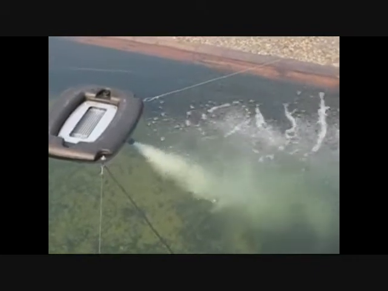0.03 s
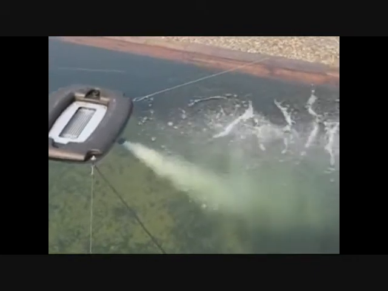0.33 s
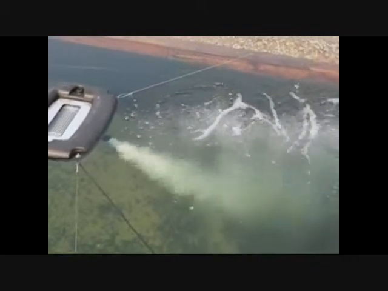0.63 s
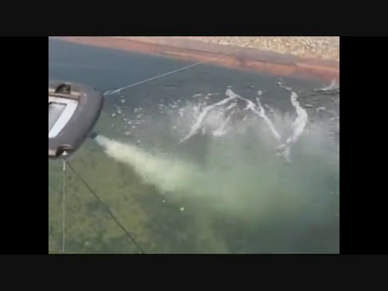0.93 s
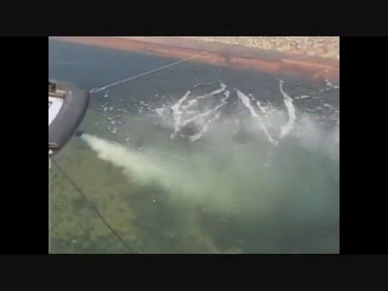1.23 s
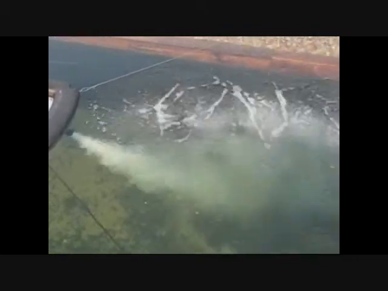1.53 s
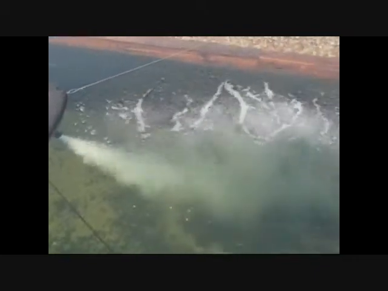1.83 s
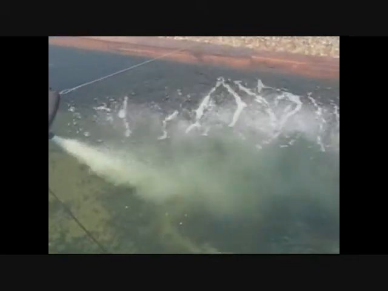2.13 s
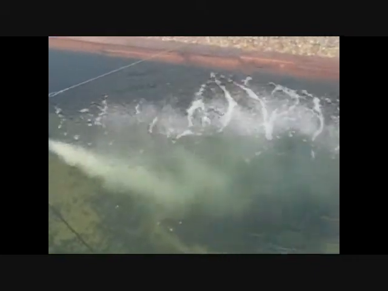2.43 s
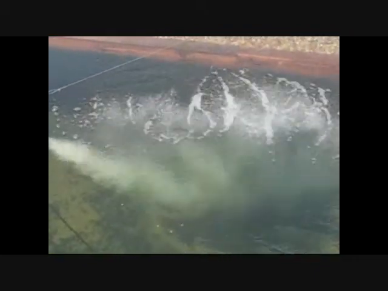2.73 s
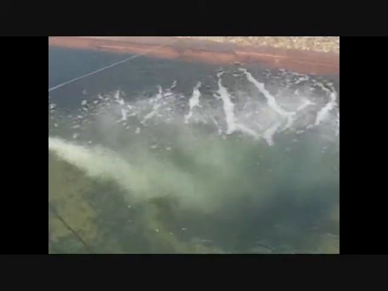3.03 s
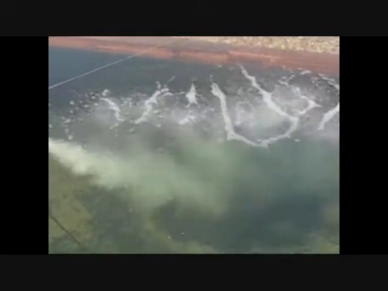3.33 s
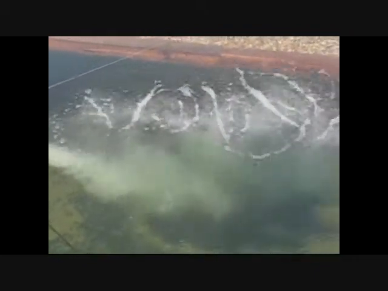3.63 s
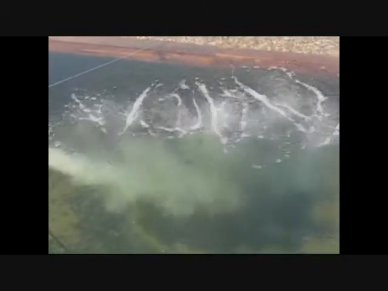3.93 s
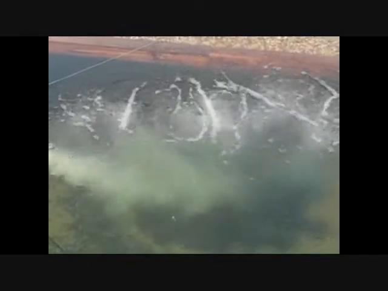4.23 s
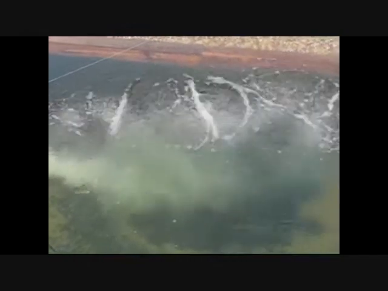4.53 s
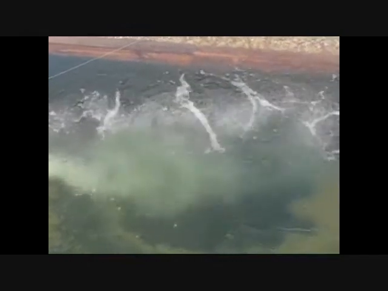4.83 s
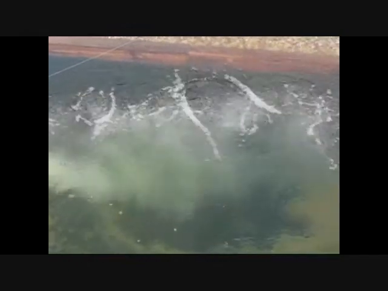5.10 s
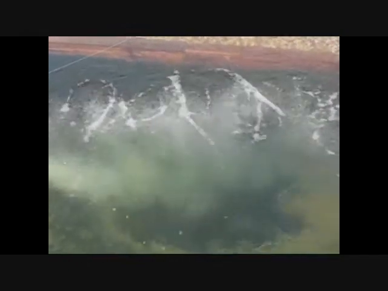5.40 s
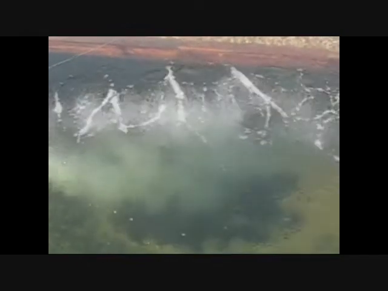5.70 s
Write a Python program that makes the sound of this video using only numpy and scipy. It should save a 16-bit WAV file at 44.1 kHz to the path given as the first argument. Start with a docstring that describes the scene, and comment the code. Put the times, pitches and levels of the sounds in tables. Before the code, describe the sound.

A floating pond aerator gurgles and fizzes steadily in churning water while a small bird chirps over and over nearby.

```python
"""A floating pond aerator drives a jet under the surface and gulps air down its intake pipe.
Air breaking into bubbles excites the pipe's hollow modes, and the same uneven flow modulates the
fizzing spray. Beneath them the water churns, bubbles ring and the submerged pump drones low.
Nearby a small bird repeats three kinds of falling chirp, each a gliding pure tone with a faint echo.
A few puffs of wind thump softly on the microphone."""
import sys
import numpy as np
from scipy import signal
from scipy.fft import rfft, irfft, next_fast_len
from scipy.io import wavfile
from scipy.ndimage import uniform_filter1d, map_coordinates

SR = 44100
rng = np.random.default_rng(int(sys.argv[2]) if len(sys.argv) > 2 else 0)


def file_out(sig):
    """Save sig as 16-bit WAV at sys.argv[1]."""
    # one column per channel
    cols = np.atleast_2d(sig).T
    # limit, then scale
    lim = np.clip(cols, -1, 1)
    pcm = np.round(lim * 32767).astype(np.int16)
    wavfile.write(sys.argv[1], SR, pcm)


N = 258426

# modes of the intake pipe's air column: frequency_hz, bandwidth_hz, gain_db
PIPE_MODES = [(267, 36, -10), (480, 70, -20), (711, 46, 0), (948, 24, 1), (1146, 22, -2), (1421, 24, -9),
              (1655, 17, -4.5), (1951, 21, -5.5), (2159, 45, -11), (2348, 34, -8), (2534, 34, -7),
              (2715, 44, -7), (2939, 40, -9), (3155, 36, -10), (3355, 32, -13)]
# big gulps of air: centre_s, gurgle_change_db, rasp_change_db
GULPS = [(.172, 0, 3), (.46, 3.5, 1), (.61, 4, 3), (.695, 4, 1), (.89, 3.5, 2.5), (1.213, 2.5, 0),
         (1.375, 2.5, 2), (1.668, 4, 1), (2.046, 7, 3), (2.14, 3, 2.5), (2.424, 4, 0), (2.606, 3.5, 1),
         (2.745, 5, 1), (2.915, 3, 0), (2.98, 5.5, .5), (3.25, 4.5, 2), (3.31, 4, 0), (3.581, 3, -0.5),
         (3.866, 3, 2.5), (4.082, 6.5, -0.5), (4.197, 5, .5), (4.343, 4, 1.5), (5.17, 2.5, 1),
         (5.396, 4, -1), (5.613, 3.5, 1), (5.775, 3, 2.5)]
# moments when the intake runs short of air: centre_s, rasp_change_db
LULLS = [(1.27, -4.5), (1.91, -4), (3.44, -2)]
# resonances of the nozzle: frequency_hz, bandwidth_hz, gain_db
NOZZLE_MODES = [(3620, 120, -2), (5230, 260, 0), (5500, 140, -6), (7110, 110, -5), (9650, 600, -8),
                (11500, 400, -7), (14100, 600, -8)]
# spectrum of the spray: frequency_hz, density_db
SPRAY_SPECTRUM = [(2000, 1.5), (3600, -3.5), (4600, 2.5), (6400, -0.5), (8200, 2), (9100, 1.5),
                  (12500, 2.5), (14200, 2), (15000, -1), (15500, -5.5)]
# single droplets bursting: peak_s, level_db
DROPLETS = [(0.471, -52), (1.382, -49), (2.784, -49), (4.518, -48), (4.785, -47)]
# spectrum of the churning water: frequency_hz, density_db
CHURN_SPECTRUM = [(25, -19), (55, 0), (90, -13), (160, -4.5), (230, -5), (390, -1.5), (600, 1),
                  (900, -11.5), (1300, -2.5), (1800, -8), (2600, -7), (3300, -18), (4500, -46)]
# bands of the pump's drone: frequency_hz, bandwidth_hz, gain_db
PUMP_BANDS = [(91.4, 6.7, 1.5), (153, 8.4, -9.5), (270, 15.3, -1)]
# the bird's three calls, each opening with a steep swoop: age_s, pitch_hz, level_db
DIP = [(0, 6200, -16), (.007, 6480, 0), (.015, 4800, 1), (.023, 3850, -5), (.042, 3590, -6),
       (.07, 4030, -8), (.088, 3830, -11), (.104, 3480, -7), (.116, 3480, -35)]
HOLD = [(0, 6700, -17), (.008, 6780, 2), (.021, 4850, -1), (.033, 4500, -1), (.055, 4590, 0),
        (.087, 4450, -6), (.1, 4450, -35)]
SLIDE = [(0, 6500, -17), (.007, 6560, 2), (.02, 5520, 1), (.034, 5200, -1), (.058, 4920, -4),
         (.07, 4150, -6), (.082, 3760, -9), (.125, 3520, -12), (.14, 3450, -30)]
# chirps: start_s, level_db, level_change_db, opening_shift_hz, call
CHIRPS = [(.062, -44.5, 7, -200, DIP), (.417, -39.5, 0.5, 0, HOLD), (.773, -42.5, 1, 102, SLIDE),
          (1.135, -36.5, -1, 150, DIP), (1.543, -38.5, -1, 250, DIP), (1.918, -41, 2, 0, DIP),
          (2.289, -38.5, -1, 0, HOLD), (2.642, -40.5, -1, 0, SLIDE), (3.002, -44.5, 7, -150, DIP),
          (3.365, -46.5, 0, 150, SLIDE), (3.715, -38.5, 0.5, -250, DIP), (4.113, -42, 3.5, 50, DIP),
          (4.467, -36.5, -4, 0, HOLD), (4.853, -41, -1.5, -200, SLIDE)]
# soft pips that close some calls, each an arch of pitch: start_s, level_db, top_hz, time_to_top_s
PIPS = [(.54, -44.5, 4800, .004), (1.259, -50, 4040, .018), (1.667, -51.5, 4020, .018),
        (2.043, -53, 4020, .018), (2.408, -45.5, 4780, .004), (3.127, -53, 4020, .018),
        (3.84, -47.5, 4030, .018), (4.241, -52, 4020, .018), (4.585, -45.5, 4770, .004)]
# puffs of wind: peak_s, level_db, time_per_20_db_s
PUFFS = [(.064, -39, .035), (.114, -33.5, .045), (.235, -48, .16), (2.3, -56, .3), (2.9, -54, .25),
         (3.0, -48, 0.08), (4.6, -51, 0.03), (4.97, -55, 0.4)]
# spectrum of wind on the microphone: frequency_hz, density_db
WIND_SPECTRUM = [(25, -31), (50, -19), (85, -5), (140, -2.5), (200, -7.5), (330, -16), (700, -36),
                 (2000, -90)]


def intake(gulping):
    """Air-column resonance: air tearing into bubbles at the pipe's foot excites its modes."""
    split_hz, gulp_half_s, lull_half_s = 1300, 0.026, 0.029
    gurgle_db = -43.8 + swells([(s, db) for s, db, _ in GULPS], gulp_half_s)
    rasp_db = -46.5 + swells([(s, db) for s, _, db in GULPS], gulp_half_s) + swells(LULLS, lull_half_s)
    # large pockets of air drive the low modes
    pockets = unit(noise() + amp(-4) * pops(rate=700, spread_db=12))
    pockets *= amp(0.95 * gulping + 0.5 * wobble(50))
    gurgle = ring(pockets, [mode for mode in PIPE_MODES if mode[0] < split_hz])
    gurgle = coloured(gurgle, [(100, 7.5), (250, -0.5), (1200, -0.5), (1500, -16), (4000, -32)])
    # a stream of small bubbles drives the high modes
    stream = noise() * amp(1.2 * gulping + 1.2 * wobble(60))
    rasp = ring(stream, [mode for mode in PIPE_MODES if mode[0] >= split_hz])
    rasp = coloured(rasp, [(700, 1), (1400, 0.5), (2400, 1.5), (3350, 1), (3600, 2), (5000, -23)])
    return amp(gurgle_db) * gurgle + amp(rasp_db) * rasp


def spray(gulping):
    """Amplitude modulation: air and droplets hiss through the nozzle, fluttering with the flow."""
    fizz = unit(noise() + amp(-7) * pops(rate=700, spread_db=18))
    hiss = coloured(fizz * amp(0.7 * gulping + 0.9 * wobble(90)), SPRAY_SPECTRUM)
    nozzle = ring(noise() * amp(0.65 * gulping + 1.8 * wobble(60)), NOZZLE_MODES)
    return amp(-52) * hiss + amp(-55) * nozzle


def droplets():
    """Broadband transients: each droplet bursts in a brief, bright spit of noise."""
    t, t60_s = np.arange(N) / SR, 0.032
    envelope = sum(amp(db - 60 * np.abs(t - peak_s) / t60_s) for peak_s, db in DROPLETS)
    return envelope * coloured(noise(), [(4000, -29), (9000, 7), (12500, 7), (15500, -16)])


def churn():
    """Turbulence: the jet stirs the water into broadband noise of wavering level."""
    return amp(-53.5) * coloured(noise() * amp(0.71 * wobble(20)), CHURN_SPECTRUM)


def bubbles(count=220, centre_hz=2550, log_scatter=0.09, decay_cycles=11, spread_db=4):
    """Damped oscillation: each surfacing bubble rings briefly while its pitch rises."""
    when, detune, strength = rng.random(count), rng.standard_normal(count), rng.standard_normal(count)
    t = np.arange(SR // 32) / SR
    hz = centre_hz * np.exp(log_scatter * detune)[:, None]
    age = t * hz / decay_cycles  # in decay time constants
    gain = amp(spread_db * np.minimum(strength, 2))[:, None]
    envelope = np.exp(-age) * (1 - np.exp(-8 * age))
    rings = gain * envelope * np.sin(2 * np.pi * hz * t * (1 + 0.023 * age))
    positions = (when * N).astype(int)[:, None] + np.arange(len(t))
    return amp(-57) * unit(np.bincount(positions.ravel(), rings.ravel(), N)[:N])


def pump():
    """Narrow-band noise: three low resonances make the submerged pump's rough drone."""
    return amp(-59.5) * ring(noise(), PUMP_BANDS)


def bird():
    """Frequency modulation: a pure whistle swoops down, often closed by a soft pip."""
    swoop_s = 0.0204  # the opening pitch shift dies away over this time
    pip_s, pip_fall_hz, pip_bend_s = 0.037, 950, 0.022
    song, size = np.zeros(N + SR), SR // 5
    age = np.arange(size) / SR
    for start_s, level_db, change_db, shift_hz, call in CHIRPS:
        pitch_hz, contour_db = curves(call, size)
        progress = age / call[-1][0]
        envelope = amp(level_db + contour_db + change_db * progress) * (progress < 1)
        tone = whistle(pitch_hz + shift_hz * np.exp(-(age / swoop_s) ** 2))
        song[round(start_s * SR):][:size] += envelope * tone
    pip_envelope = np.sin(np.pi * np.minimum(age / pip_s, 1))
    for start_s, level_db, top_hz, top_s in PIPS:
        fall = 1 - np.exp(-((age - top_s) / pip_bend_s) ** 2)
        tone = whistle(top_hz - pip_fall_hz * fall)
        song[round(start_s * SR):][:size] += amp(level_db) * pip_envelope * tone
    return song[:N] * amp(1.3 * wobble(120))


def garden_echo(song, level_db=-11.5, t60_s=0.39):
    """Reverberation: the garden scatters the song into a faint, exponentially decaying tail."""
    t = np.arange(SR // 2) / SR
    tail = rng.standard_normal(len(t)) * amp(-60 * t / t60_s)
    return song + amp(level_db) * signal.fftconvolve(song, tail / np.linalg.norm(tail))[:N]


def wind():
    """Pressure fluctuation: puffs of air swell and die away as low thumps on the microphone."""
    t = np.arange(N) / SR
    envelope = sum(amp(db - 20 * np.abs(t - peak_s) / fall_s) for peak_s, db, fall_s in PUFFS)
    return envelope * coloured(noise(), WIND_SPECTRUM)


def amp(db):
    """Decibels to amplitude ratio."""
    return 10 ** (np.asarray(db) / 20)


def unit(x):
    """Normalisation to rms 1."""
    return x / np.sqrt(np.mean(x ** 2) + 1e-20)


def noise():
    """Gaussian white noise."""
    return rng.standard_normal(N)


def pops(rate, spread_db):
    """Shot noise: on average rate impulses a second, of scattered size, at rms 1."""
    return unit((rng.random(N) < rate / SR) * np.sign(noise()) * amp(-spread_db * rng.random(N)))


def wobble(rate):
    """Random modulation: a smooth curve through rate knots a second."""
    return map_coordinates(rng.standard_normal(int(N * rate / SR) + 4), [np.arange(N) * rate / SR])


def swells(rows, half_s):
    """Superposition of Gaussian swells, each falling to 1/e at half_s from its centre."""
    t = np.arange(N) / SR
    return sum(height * np.exp(-((t - centre_s) / half_s) ** 2) for centre_s, height in rows)


def curves(rows, size):
    """Linear interpolation: one value per sample for each column after the time."""
    times_s, *columns = np.transpose(rows)
    return [np.interp(np.arange(size) / SR, times_s, column) for column in columns]


def whistle(hz):
    """Phase as the integral of frequency: a sine follows a smoothed pitch curve."""
    return np.sin(2 * np.pi * np.cumsum(uniform_filter1d(hz, size=170)) / SR)


def filtered(x, response):
    """Linear filtering: the spectrum of x times a frequency response."""
    size = next_fast_len(N + SR // 2)
    return irfft(rfft(x, size) * response(np.fft.rfftfreq(size, 1 / SR)), size)[:N]


def coloured(x, spectrum):
    """Spectral shaping by (frequency_hz, gain_db) points on a log axis, at rms 1."""
    points_hz, db = np.transpose(spectrum)
    return unit(filtered(x, lambda hz: amp(np.interp(np.log(hz + 1), np.log(points_hz), db))))


def ring(x, modes):
    """Modal superposition: x drives resonances of alternating sign, as along a pipe, at rms 1."""
    def response(hz):
        return sum((-1) ** k * amp(db) * 1j * hz * width / (centre ** 2 - hz ** 2 + 1j * hz * width)
                   for k, (centre, width, db) in enumerate(modes))
    return unit(filtered(x, response))


def scene():
    """Superposition of all sources; one uneven gulping modulates both the pipe and the spray."""
    gulping = unit(wobble(45) + 0.5 * wobble(100))
    gulping = unit(gulping - uniform_filter1d(gulping, size=SR // 8))  # the mean air flow stays steady
    aerator = intake(gulping) + spray(gulping) + droplets() + churn() + bubbles() + pump()
    return (aerator + garden_echo(bird()) + wind())[None]


def record(dry):
    """Band limiting: an ideal low-pass filter removes the highest treble."""
    cutoff_hz = 15480
    return filtered(dry[0], lambda hz: hz < cutoff_hz)[None]


dry = scene()
out = record(dry)
file_out(out)
```